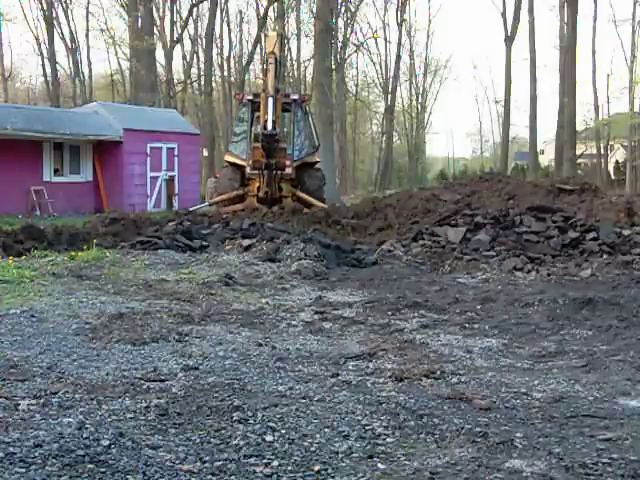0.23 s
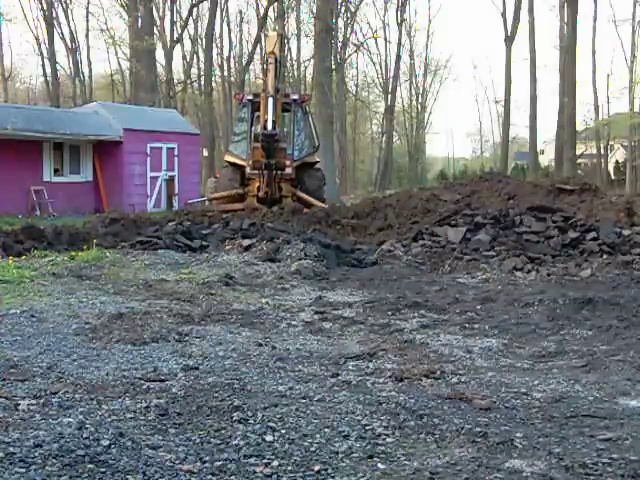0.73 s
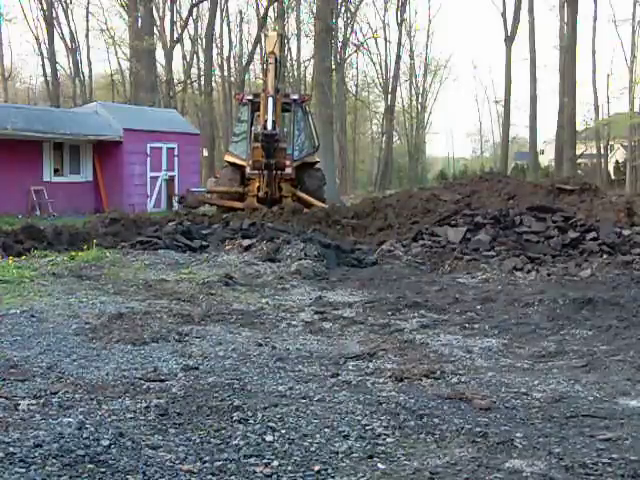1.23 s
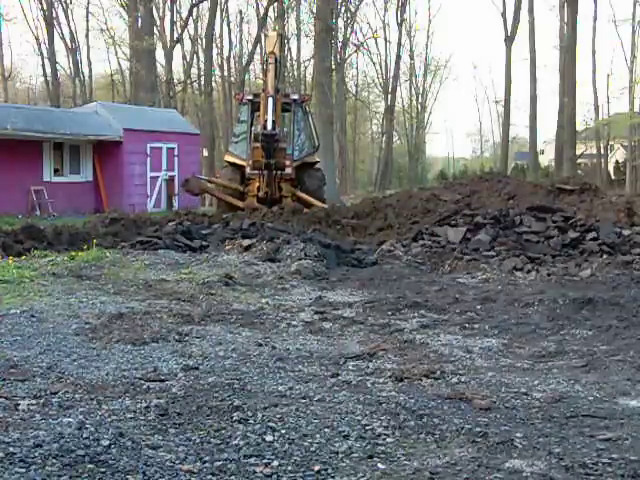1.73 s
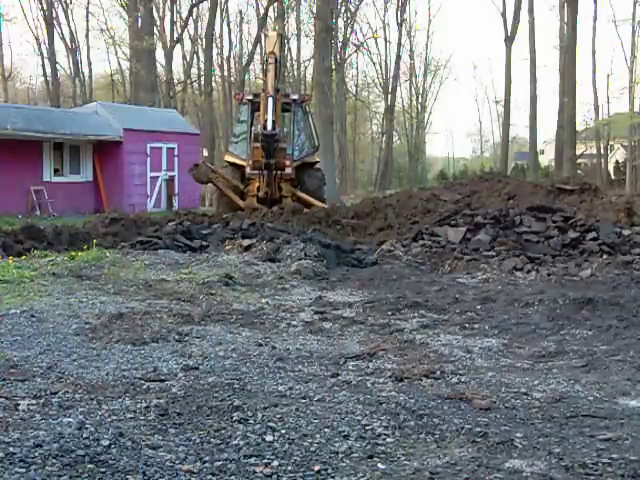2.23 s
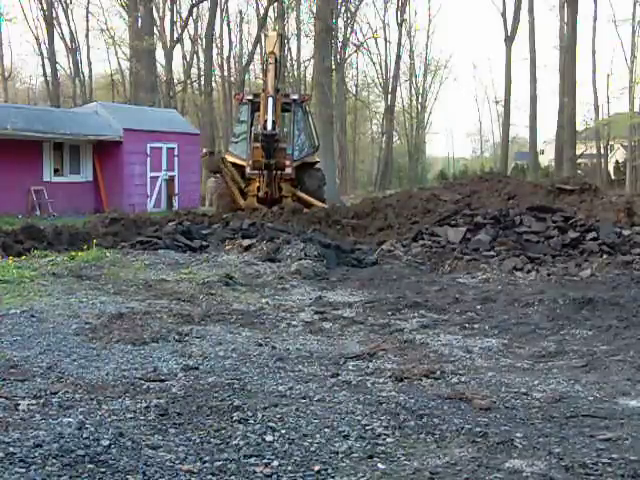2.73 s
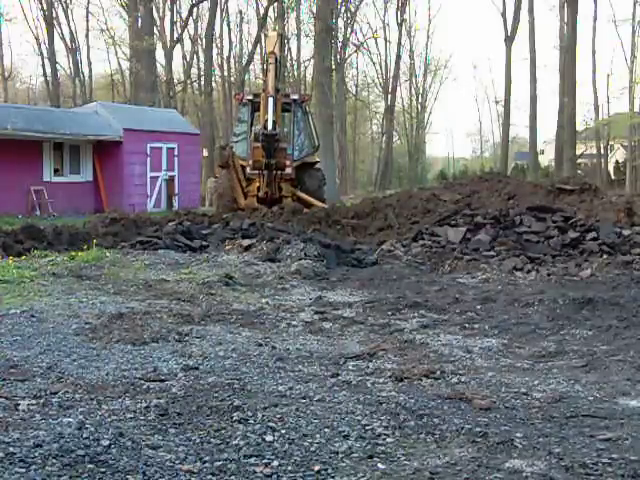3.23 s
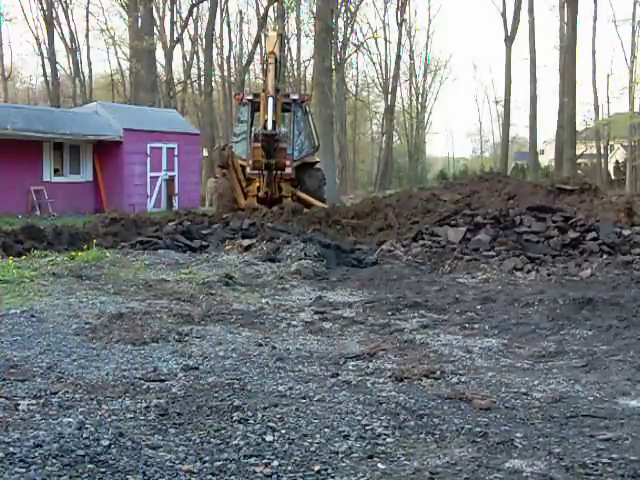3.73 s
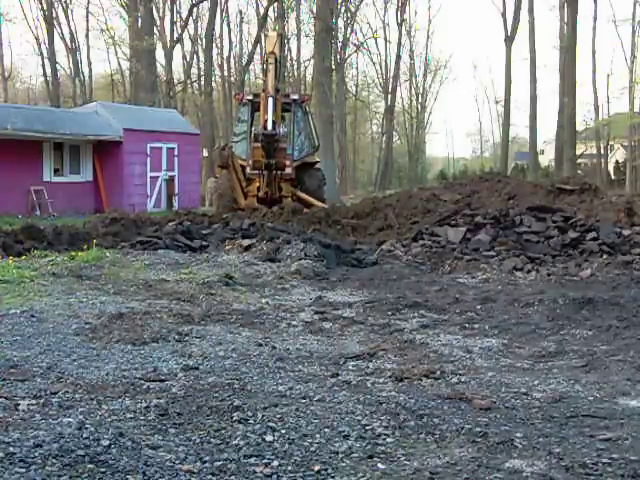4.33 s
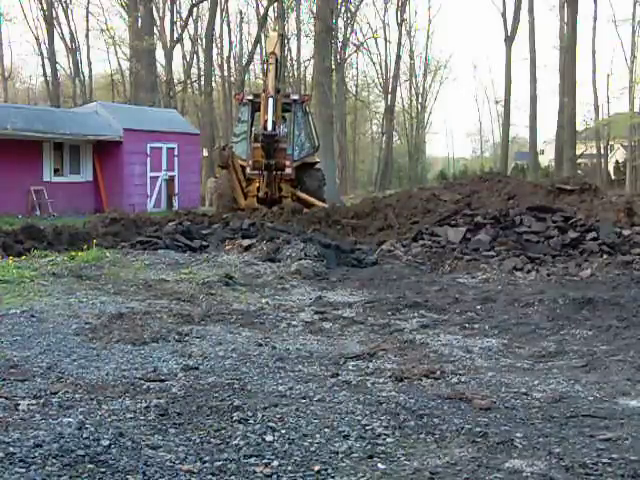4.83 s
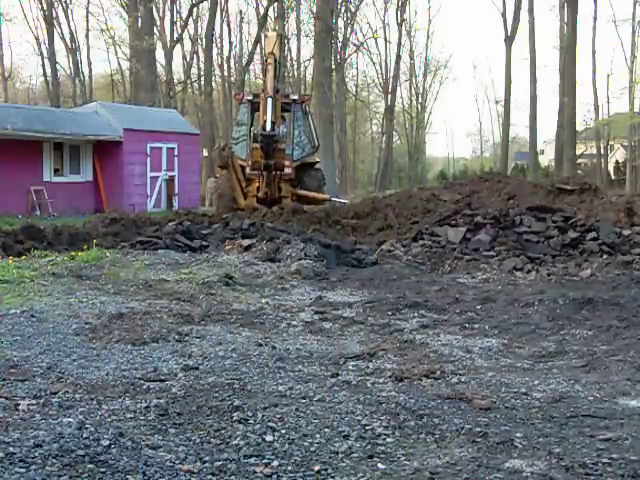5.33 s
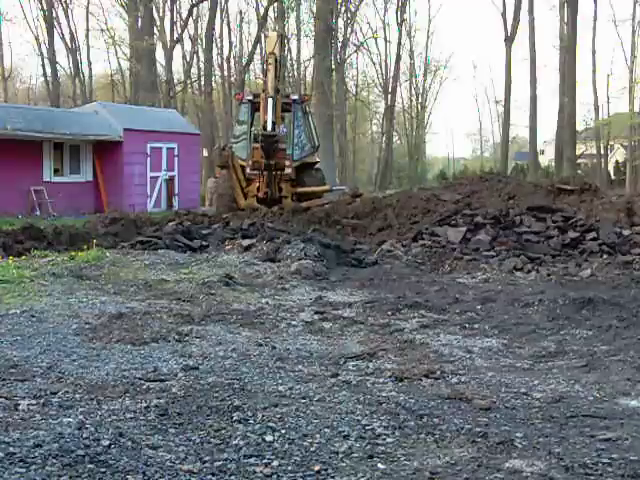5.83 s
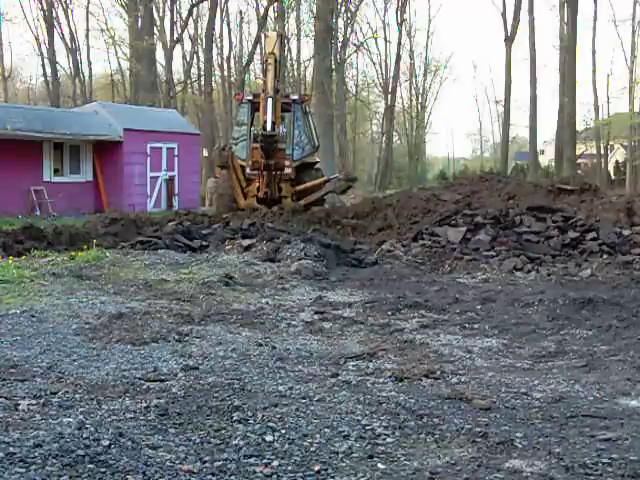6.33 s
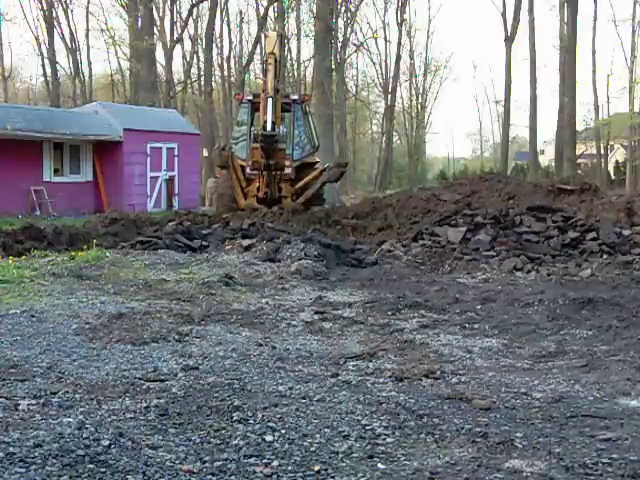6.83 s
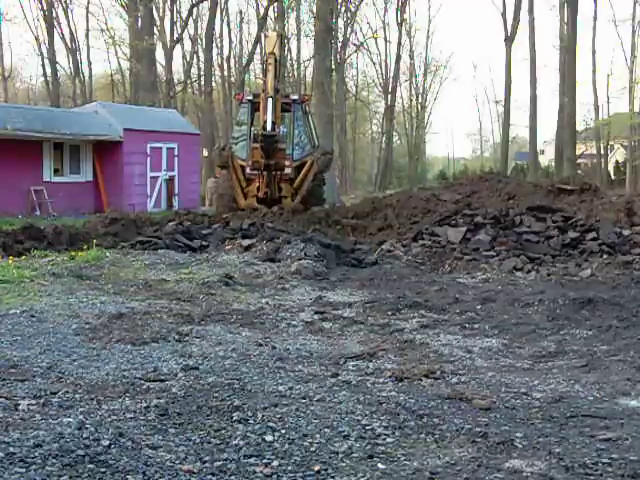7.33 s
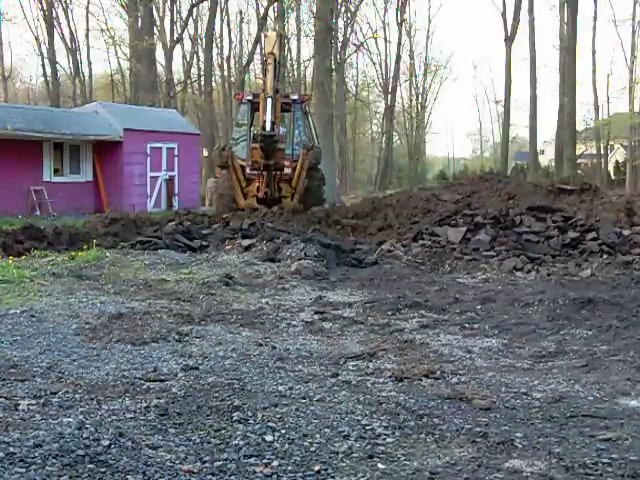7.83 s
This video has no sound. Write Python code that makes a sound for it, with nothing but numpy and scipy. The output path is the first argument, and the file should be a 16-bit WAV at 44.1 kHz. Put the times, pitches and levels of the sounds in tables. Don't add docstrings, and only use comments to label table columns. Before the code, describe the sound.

Lumpy low diesel idle surges into a throaty drone with clatter, hydraulic hiss and faint whistles, lurching repeatedly before a small metal knock.

```python
import sys
import numpy as np
from scipy import signal
from scipy.fft import rfft, irfft, next_fast_len
from scipy.io import wavfile
from scipy.ndimage import uniform_filter1d

SR = 44100
rng = np.random.default_rng(int(sys.argv[2]) if len(sys.argv) > 2 else 0)


def nominal_scale(level):
    x = np.asarray(level, float) / 20
    return 10 ** x


def int16_out(signal):
    q = np.round(np.clip(np.atleast_2d(signal).T, -1, 1) * 32767)
    wavfile.write(sys.argv[1], SR, q.astype(np.int16))


N = 356107
T = np.arange(N) / SR

# (pressure peak time [s], peak level [dB], rasp level [dB])
IDLE_FIRINGS = [(.007, -19, -43.5), (0.057, -22, -52), (.1, -47, -50), (0.147, -39, -53), (.207, -36, -62),
                (.25, -40, -54), (0.284, -28, -51), (.345, -21.5, -47), (0.397, -21, -46),
                (0.444, -22, -39.5), (0.484, -27.5, -45.5), (.538, -34.5, -58), (.578, -27.5, -50),
                (.631, -29, -55), (0.686, -26.5, -46), (0.741, -29, -44), (0.795, -25.5, -47),
                (.848, -21, -45), (.892, -22, -42.5)]
ORDER_PHASE_RAD = [1.3, 0, 3.6, 2.7]
# (level at full fuel [dB], share of fuel swing [dB/dB])
ORDER_MIX = [(-25, 1.06), (-25.5, 0.28), (-38, 0.43), (-36, 0.64)]
# (order [per firing], level [dB])
UNEVEN_LINES = [(.75, -13), (1.25, -3), (1.75, -0.5), (2.25, -1.5), (2.75, -7.5), (4.75, -9.5), (6, -11.5),
                (7.002, -23.5)]
# (frequency [Hz], half width [Hz], gain [dB])
MOUNTS = (30, 3, 12)
# (frequency [Hz], half width [Hz], gain [dB])
PATH = [(30, 15, -9), (58.1, 9.7, 4.5), (85.2, 7.2, -7.5), (117, 6.5, 0.1), (138.1, 7.3, -21),
        (159, 5.8, -6), (196.4, 13, 7.5), (216, 4.5, -6), (238.4, 6.1, 2), (259.6, 8.7, -13),
        (276, 10, -7.5)]
# (time [s], target [firings/s], settling time [s])
LEVERS = [(0.88, 75.3, 0.705), (2.262, 53.6, 0.065), (2.52, 50.5, 0.109), (3.146, 56.3, 0.072),
          (3.389, 54.8, 0.015), (4.402, 79.2, 1.333), (4.879, 50.6, 0.028), (5.131, 79.2, 1.063),
          (5.501, 57.2, 0.009), (5.564, 71.7, 0.6), (5.847, 55.6, 0.012), (5.86, 107.9, 2.357),
          (6.532, 61.6, 0.85), (7.03, 56.5, 0.299), (7.636, 59.0, 0.15), (7.894, 65.6, 0.09)]
# (time [s], exhaust pulse level [dB], gear tone level [dB], pulse sharpness [dB])
FUEL = [(.88, -16, -46.5, 5.5), (1.55, -23.5, -54, 0), (2.22, -26.5, -64.5, 1.8), (2.42, -30, -57, -6.5),
        (2.72, -28, -62, -2), (3.22, -28.5, -60, -2.2), (3.35, -33.5, -68, -4), (4.33, -31.5, -54.5, 1.6),
        (4.47, -28, -62.5, 0.7), (4.78, -28, -56.5, 4.5), (4.97, -29.5, -55.5, -2.5),
        (5.17, -24.5, -59, -0.5), (5.43, -24.5, -61.5, -2.1), (5.96, -27.5, -60, -1.5),
        (6.32, -24, -65.5, -0.3), (6.56, -29.5, -59, 1), (7.92, -26.5, -64, -1.7), (8.07, -34.5, -67, 5)]
# (time [s], combustion knock level [dB], oil flow level [dB])
EFFORT = [(0, -49.5, -50.5), (.22, -53.5, -56), (.78, -53, -55), (.94, -46, -46), (1.3, -46.5, -46.5),
          (1.82, -51, -52), (2.2, -51.5, -51), (2.36, -55.5, -55.5), (3.08, -54.5, -55), (3.17, -52, -56),
          (3.44, -57, -60), (4.8, -50.5, -54), (5.1, -50.5, -52.5), (5.46, -51.5, -52), (6.14, -52, -52),
          (7.55, -53, -53.5), (7.8, -51.5, -53), (8.07, -56.5, -59.5)]
# (time [s], half length [s], fuel change [dB], effort change
# [dB])
LURCHES = [
    (.33, 0.041, -3, 5),
    (0.412, 0.044, 0, 6.5),
    (2.312, 0.063, -18.5, -1),
    (4.891, 0.094, -4, -4.5),
    (5.511, 0.033, -3.5, -4),
    (5.856, 0.04, -8, -5.5),
    (7.743, 0.025, 1, 2),
]
# (frequency [Hz], half width [Hz], gain [dB])
FAN_SHROUD = [(175.5, 8, 1), (192, 5, -3), (228.3, 8.2, 8.5)]
# (frequency [Hz], half width [Hz], gain [dB])
PUMP_HOUSING = [(301, 9.6, 3), (330.5, 8, -7.5), (346, 4.3, 6.5), (550, 12, 6), (690, 45, 2.5),
                (830, 9.7, 6.5), (1042, 45, 8.5)]
GEAR_TONES_DB = [0.5, -71.5, -76]
# (time [s], half length [s], gain [dB])
GEAR_DIPS = [
    (1.903, 0.21, -11),
    (5.602, .1, -2.5),
]
# (frequency [Hz], density [dB/Hz])
RUSH_SPECTRUM = [(15, 9), (40, 17), (90, 11), (160, 13), (250, 8.5), (350, 3), (500, 3.5), (620, -2.5),
                 (850, -2.5), (1050, -2), (1400, -28)]
# (frequency [Hz], density [dB/Hz])
CLATTER_SPECTRUM = [(800, -35), (1050, -7), (1250, -2), (1800, -0.5), (2400, -1.5), (2700, -5), (3200, -5),
                    (3900, -10), (5000, -25.5)]
# (frequency [Hz], density [dB/Hz])
HISS_SPECTRUM = [(2600, -30.5), (3400, -9.5), (4000, -3.5), (4800, -1.5), (5500, -4), (6500, -6),
                 (7300, -6.5), (7700, -11.5), (8000, -23.5)]
# (frequency [Hz], width [Hz], level [dB])
BLOCK_RINGS = [(1307, 12, -65.5), (1399, 32, -66), (1540, 34, -65.5), (1725, 50, -66), (2056, 30, -66),
               (2295, 54, -63.5), (5000, 54, -77)]
# (time [s], peak level [dB], frequency [Hz])
PINGS = [(0.348, -37, 2310), (0.4463, -38, 2270), (0.9332, -35, 2170), (1.1412, -33, 2080),
         (1.2534, -33, 2220), (1.3193, -36, 1530), (1.4231, -36, 1290), (1.5682, -36, 2420),
         (5.3616, -40, 1300), (5.5367, -38, 1390), (5.7382, -40, 1400), (6.6631, -38, 2310),
         (6.9575, -40, 2440), (7.0927, -37, 2400), (7.4848, -39, 2440), (7.6918, -39, 2440)]
# (start [s], end [s], frequency [Hz], width [Hz], level [dB])
WHISTLES = [
    (.3, .48, 5350, 149, -59),
    (0.435, 0.556, 3190, 150, -56),
    (.95, 1.7, 4940, 120, -59.5),
    (4.946, 5.5, 6270, 260, -60.5),
    (6.0, 6.605, 4540, 302, -59),
    (6.1, 6.604, 4210, 150, -66),
    (6.7, 6.95, 6600, 80, -65),
    (6.95, 7.5, 6630, 120, -69.5),
    (6.65, 7.702, 4530, 300, -61.5),
    (7.83, 7.87, 6270, 200, -58),
]
# (time [s], peak level [dB], frequency [Hz])
CHIRPS = [
    (0.897, -47, 5200),
    (0.932, -42, 5470),
    (.967, -49, 5740),
    (1.03, -44, 5770),
]
# (time [s], peak level [dB])
PIN_KNOCKS = [
    (7.7575, -37),
]
# (frequency [Hz], level [dB], t60 [s])
PIN_MODES = [(1050, -8, .05), (1370, -4, .05), (1670, 0, .07), (3050, -3, .035), (4400, -7, .03)]
# (frequency [Hz], gain [dB])
IMAGE = [(8000, -0.5), (8200, -4), (8400, -12), (8600, -20), (8800, -24), (9000, -31.5), (9150, -60)]


def rms_one(x):
    return x / np.sqrt(np.mean(x ** 2) + 1e-20)


def in_time(rows):
    s, *columns = np.transpose(rows)
    return [np.interp(T, s, column) for column in columns]


def drift(rate_hz):
    r = np.exp(-80 * np.pi * rate_hz / SR)
    white = rng.standard_normal(N // 40 + 2002)
    slow = signal.lfilter([1], [1, -2 * r, r * r], white)[2000:]
    return np.interp(np.arange(N) / 40, np.arange(len(slow)), rms_one(slow))


def ring(x, hz, width_hz):
    r = np.exp(-np.pi * width_hz / SR)
    w = 2 * np.pi * hz / SR
    return signal.lfilter([0, np.sin(w)], [1, -2 * r * np.cos(w), r * r], x + 1e-18)


def ring_twice(x, hz, first_width_hz, second_width_hz):
    return ring(ring(x, hz, first_width_hz), hz, second_width_hz)


def clicks(times_s, sizes):
    out = np.zeros(N)
    at = np.round(np.asarray(times_s) * SR).astype(int)
    out[np.clip(at, 0, N - 1)] = sizes
    return out


def coloured(x, spectrum):
    size = next_fast_len(N)
    hz, db = np.transpose(spectrum)
    log_bins = np.log(np.arange(size // 2 + 1) * SR / size + 1)
    shape_db = np.interp(log_bins, np.log(hz), db, left=-60, right=-80)
    return rms_one(irfft(rfft(x, size) * nominal_scale(shape_db), size)[:N])


def bump(x, centre, half):
    return np.exp(-((x - centre) / half) ** 2)


def hills(x, spots):
    return sum(db * bump(x, *spot) for *spot, db in spots)


def speed():
    pickup_rate, flywheel_s = 24, .06
    out, now = np.full(N, float(pickup_rate)), pickup_rate
    ends_s = [row[0] for row in LEVERS[1:]] + [N / SR]
    for (s, aim, settle_s), end_s in zip(LEVERS, ends_s):
        after = T >= s
        out[after] = aim + (now - aim) * np.exp(-(T[after] - s) / settle_s)
        now = aim + (now - aim) * np.exp(-(end_s - s) / settle_s)
    return uniform_filter1d(out, size=round(flywheel_s * SR))


def firings():
    idle_s = np.array(IDLE_FIRINGS)[:, 0]
    revving = np.cumsum(speed() * (T > idle_s[-1])) / SR
    return np.interp(T, idle_s, np.arange(len(idle_s))) + revving


def fuel_swing_db():
    full_fuel_db = -25
    cuts_db = sum(fuel_db * bump(T, s, half_s) for s, half_s, fuel_db, _ in LURCHES)
    return in_time(FUEL)[0] + cuts_db - full_fuel_db


def effort_db():
    lag_s, flow_share = 0.025, 0.49
    knock_db, flow_db = in_time(EFFORT)
    shudder_db = sum(db * bump(T - lag_s, s, half_s) for s, half_s, _, db in LURCHES)
    return knock_db + shudder_db, flow_db + flow_share * shudder_db


def path_db(hz):
    grid_hz = np.arange(20., 420.)
    slope_db = -5 - 7 * np.log2(np.maximum(grid_hz / 60, 1))
    return np.interp(hz, grid_hz, slope_db + hills(grid_hz, PATH))


def line(count, order, db, wobble_db, slip_rad=0):
    phase = 2 * np.pi * order * count + slip_rad
    return np.sqrt(2) * nominal_scale(db + wobble_db * drift(6.8)) * np.cos(phase)


def idle_puffs():
    stack_hz, stack_width_hz, stack_lead_s = 60, 33, .015
    s, db, rasp_db = np.transpose(IDLE_FIRINGS)
    kick = clicks(s + 0.0317 - stack_lead_s, -nominal_scale(db))
    puff = ring_twice(kick, stack_hz, stack_width_hz, stack_width_hz) * nominal_scale(-38.5)
    puff = signal.sosfilt(signal.butter(2, 28, "high", fs=SR, output="sos"), puff)
    late = clicks(s + .034, nominal_scale(rasp_db))
    rasp = ring(ring(late, 119, 40), 139, 40) * nominal_scale(-24.5)
    rasp += ring(ring(late, 190, 82), 200, 82) * nominal_scale(-23.5)
    lead = round(.03 * SR)
    return np.pad((puff + rasp)[lead:], (0, lead))


def exhaust(count):
    rate, swing_db, sharp_db = speed(), fuel_swing_db(), in_time(FUEL)[2]
    ahead = rate + 0.052 * uniform_filter1d(np.gradient(rate) * SR, size=SR // 4)
    levels_db = []
    for k, (db, share) in enumerate(ORDER_MIX):
        edge_db = sharp_db if k > 0 else 0
        levels_db.append(db + share * swing_db + edge_db + path_db((k + 1) * ahead))
    light_load_db = np.clip(-28 - uniform_filter1d(levels_db[0], size=SR // 2), 0, 7)
    lean_rad = -.38 * light_load_db * np.clip(T - 1.2, 0, 1)

    crank_db = -60.5 + hills(rate / 2, [MOUNTS])
    out = line(count, .5, crank_db, 1.5)
    for k, db in enumerate(levels_db):
        out += line(count, k + 1, db, .2 + .25 * k, slip_rad=ORDER_PHASE_RAD[k] + k * lean_rad)
    uneven_db = -59.5 + 20.5 * bump(rate, 41, 7.5)
    for order, db in UNEVEN_LINES:
        off_load_db = 0.69 * light_load_db * (order < 3)
        slip_rad = 0.78 * drift(1.1) + order
        out += line(count, order, uneven_db + off_load_db + db, 2.8, slip_rad)
    return out


def fan(count):
    order = 3.29
    hz = order * speed()
    fan_db = -39 + .2 * fuel_swing_db() + path_db(hz) + hills(hz, FAN_SHROUD)
    return line(count, order, fan_db, 1.0) + line(count, 2 * order, -76, 1.9)


def pump(count):
    order, rate = 5, speed()
    shake_rad = .3 * drift(5)
    dip_db, pressure_db = hills(T, GEAR_DIPS), in_time(FUEL)[1]
    out = np.zeros(N)
    for k, tone_db in enumerate(GEAR_TONES_DB, start=1):
        db = tone_db + dip_db + hills(k * order * rate, PUMP_HOUSING)
        if k == 1:
            db = db + pressure_db
        out += line(count, k * order, db, 1.6, slip_rad=k * shake_rad)
    return out


def gate(count, depth, spread_db):
    strength = nominal_scale(spread_db * rng.standard_normal(600))[count.astype(int) % 600]
    burst = strength * np.exp(-3.0 * (count % 1))
    return 1 + depth * uniform_filter1d(burst, size=60)


def gas_rush():
    labour_db = 0.111 * np.maximum(53.4 - speed(), 0)
    rush_db = -58 + 0.91 * (in_time(EFFORT)[0] + 52) + labour_db
    return coloured(rng.standard_normal(N), RUSH_SPECTRUM) * nominal_scale(rush_db + 8.0 + 0.31 * drift(4.3))


def clatter(knock):
    level = nominal_scale(effort_db()[0] - 0.34 + 0.47 * drift(12))
    return coloured(rng.standard_normal(N) * knock, CLATTER_SPECTRUM) * level


def hiss(knock):
    level = nominal_scale(effort_db()[1] - 1.66 + 0.28 * drift(12))
    return coloured(rng.standard_normal(N) * np.sqrt(knock), HISS_SPECTRUM) * level


def block_rings(count):
    strike = rng.standard_normal(N) * nominal_scale(effort_db()[0] + 56.5)
    out = np.zeros(N)
    for hz, width_hz, db in BLOCK_RINGS:
        struck = strike * gate(count, 1.4, 5.5)
        out += ring(struck, hz, width_hz) * nominal_scale(db) * np.sqrt(width_hz / SR)
    return out


def injector_ticks(count):
    at = np.flatnonzero(np.diff(count.astype(int)))
    loud_db = effort_db()[0][at]
    out = np.zeros(N)
    for hz in (2280, 2440):
        luck_db = 3.5 * rng.standard_normal(len(at))
        out += ring_twice(clicks(at / SR, nominal_scale(loud_db - 25 + luck_db)), hz, 300, 130)
    return out


def pings():
    return sum(ring_twice(clicks([s], nominal_scale(db - 29)), hz, 300, 90) for s, db, hz in PINGS)


def whistles():
    out, white = np.zeros(N), rng.standard_normal(N)
    for start_s, end_s, hz, width_hz, db in WHISTLES:
        a, b = int(start_s * SR), int(end_s * SR)
        tone = rms_one(ring_twice(np.roll(white, -a), hz, width_hz, width_hz)[:b - a])
        out[a:b] += tone * nominal_scale(db) * np.sqrt(np.hanning(b - a))
    return out


def belt_chirps():
    return sum(ring_twice(clicks([s], nominal_scale(db - 23.5)), hz, 130, 130) for s, db, hz in CHIRPS)


def pin_noise(decay_s):
    s, db = np.transpose(PIN_KNOCKS)
    decay = signal.lfilter([1], [1, -np.exp(-1 / (decay_s * SR))], clicks(s, nominal_scale(db)) + 1e-18)
    return decay * rng.standard_normal(N)


def pin_knock():
    tick, rattle = pin_noise(.005), pin_noise(.004)
    bright = signal.butter(2, [1000, 5500], "band", fs=SR, output="sos")
    out = signal.sosfilt(bright, tick) * nominal_scale(5)
    for hz, db, t60_s in PIN_MODES:
        width_hz = np.log(1000) / (np.pi * t60_s)
        out += ring(rattle, hz, width_hz) * nominal_scale(db - 29)
    return out


def scene():
    count = firings()
    running = np.clip((T - .885) / 0.1, 0, 1)
    tones = running * (exhaust(count) + fan(count) + pump(count))
    knock = gate(count, .6, 1.5)
    noises = gas_rush() + clatter(knock) + hiss(knock) + block_rings(count)
    small = injector_ticks(count) + pings() + whistles() + belt_chirps() + pin_knock()
    return (idle_puffs() + tones + noises + small)[None]


def band_limit(x):
    return signal.sosfilt(signal.butter(12, 8850, fs=SR, output="sos"), x)


def record(dry):
    size = next_fast_len(N)
    spectrum = rfft(dry, size)
    fold = round(8000 * size / SR)
    hz = np.arange(fold, 2 * fold) * SR / size
    image_gain = nominal_scale(np.interp(hz, *np.transpose(IMAGE), right=-120))
    spectrum[:, fold:] = 0
    spectrum[:, fold:2 * fold] = np.conj(spectrum[:, fold:0:-1]) * image_gain
    mix = irfft(spectrum, size)[:, :N]
    return band_limit(mix)


dry = scene()
out = record(dry)
int16_out(out)
```